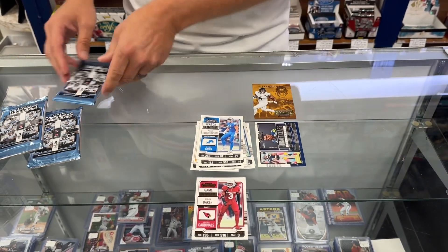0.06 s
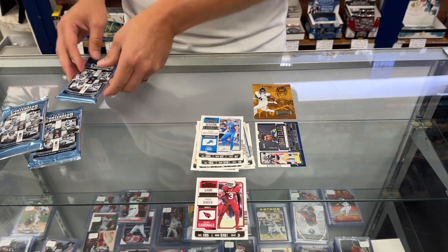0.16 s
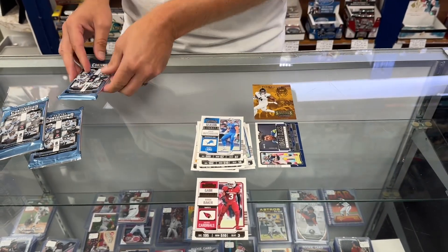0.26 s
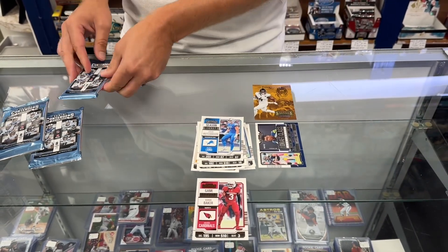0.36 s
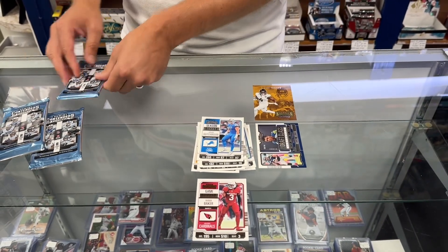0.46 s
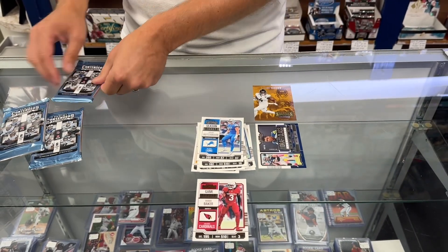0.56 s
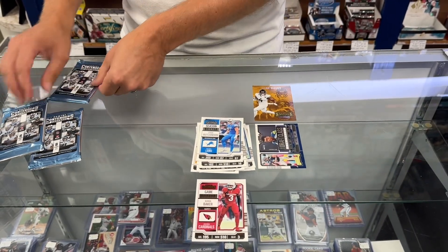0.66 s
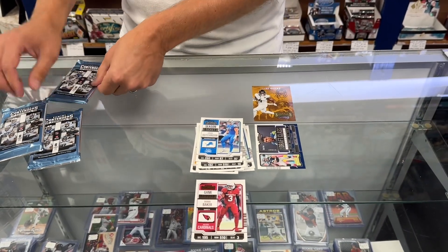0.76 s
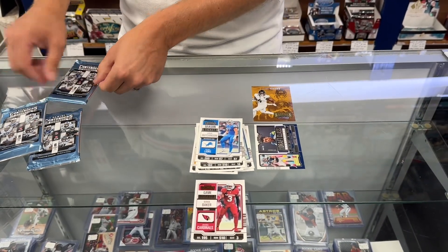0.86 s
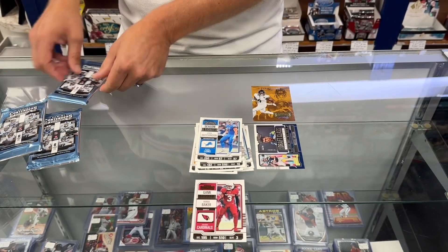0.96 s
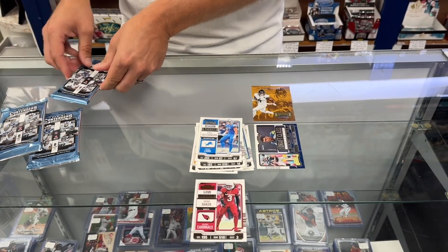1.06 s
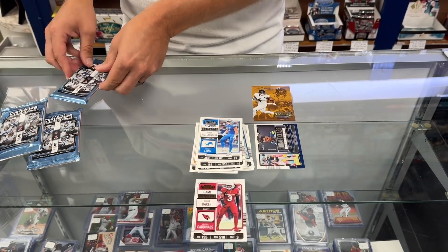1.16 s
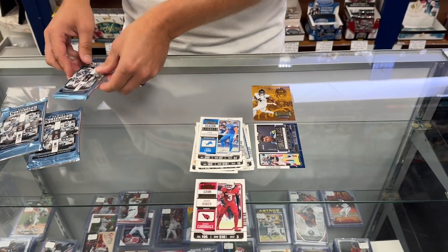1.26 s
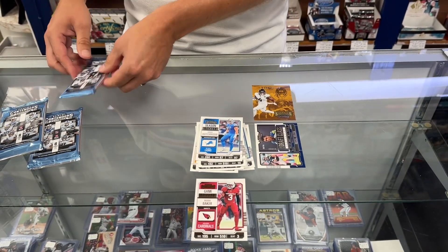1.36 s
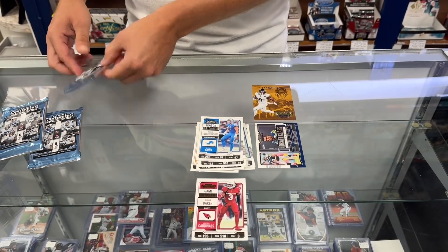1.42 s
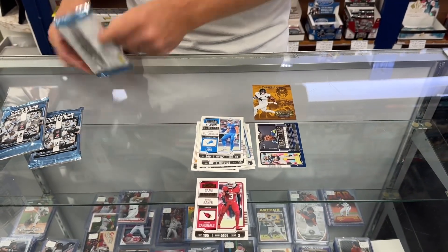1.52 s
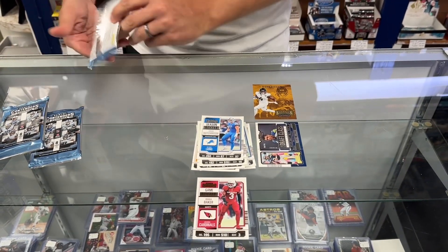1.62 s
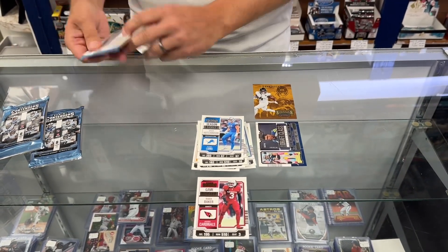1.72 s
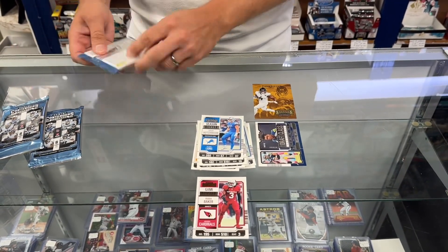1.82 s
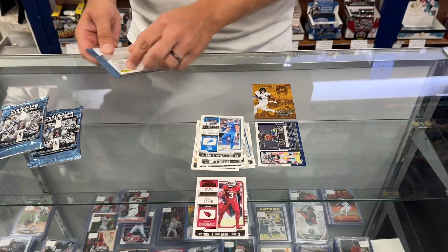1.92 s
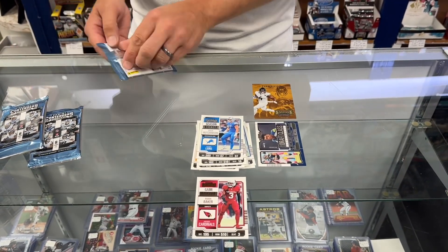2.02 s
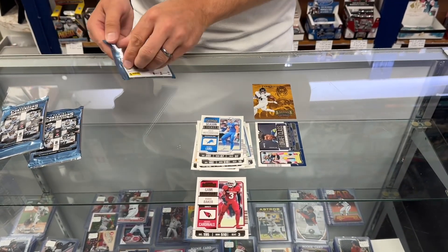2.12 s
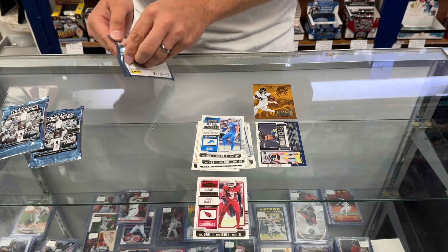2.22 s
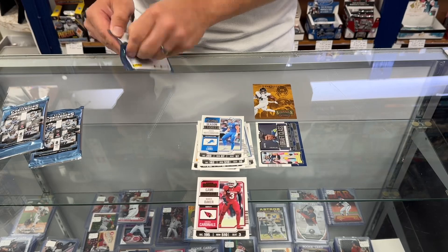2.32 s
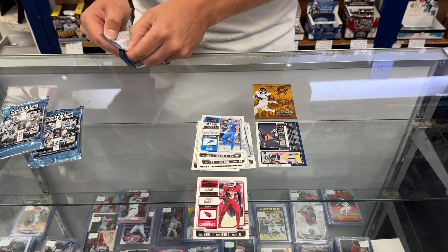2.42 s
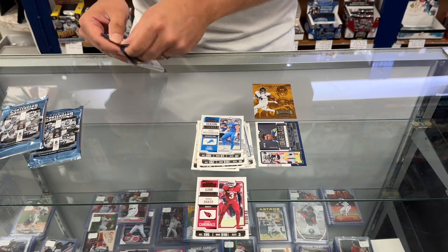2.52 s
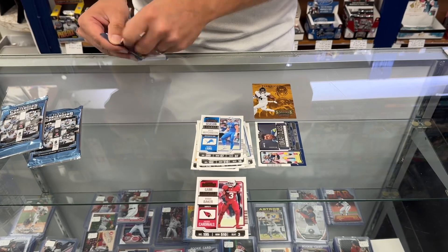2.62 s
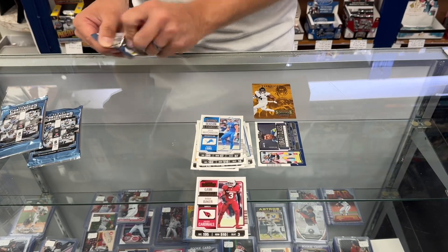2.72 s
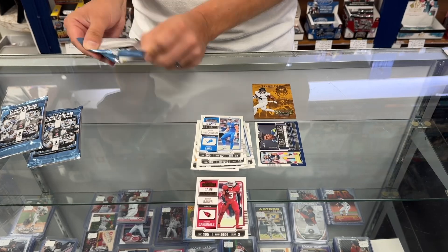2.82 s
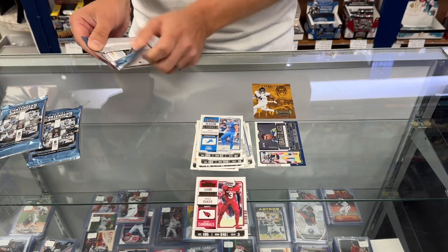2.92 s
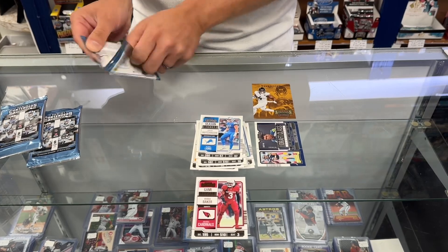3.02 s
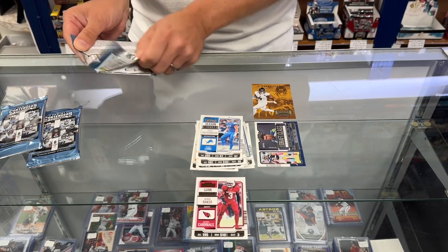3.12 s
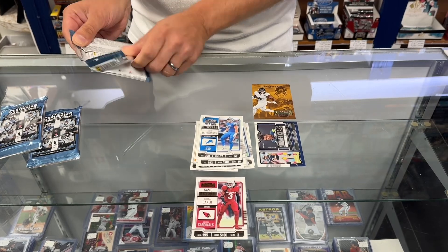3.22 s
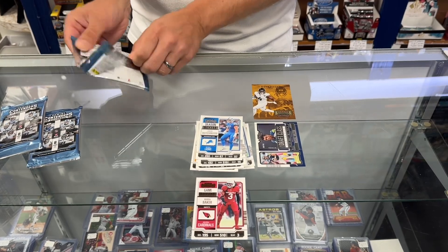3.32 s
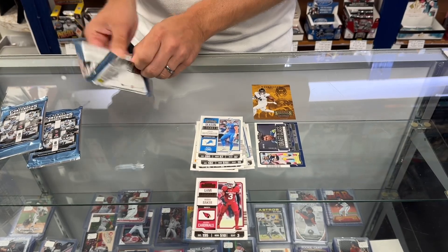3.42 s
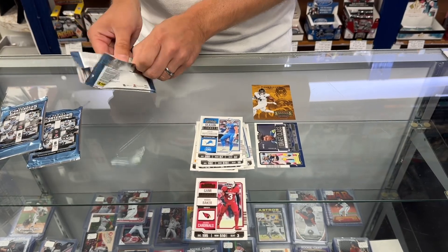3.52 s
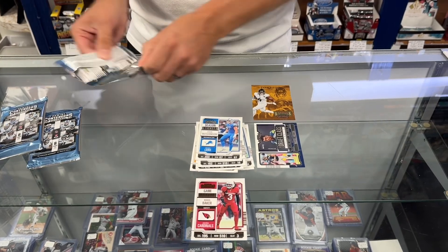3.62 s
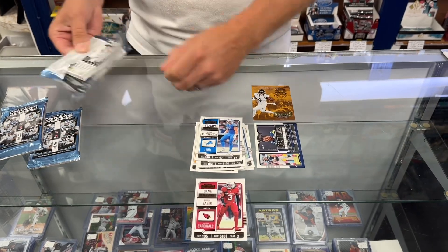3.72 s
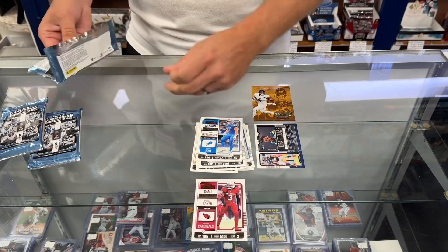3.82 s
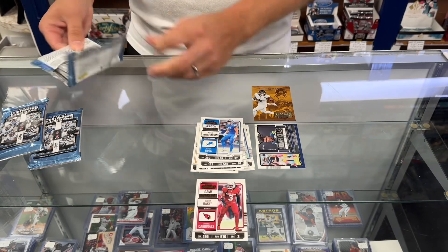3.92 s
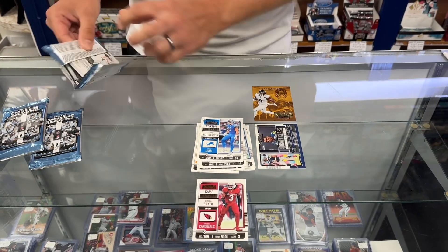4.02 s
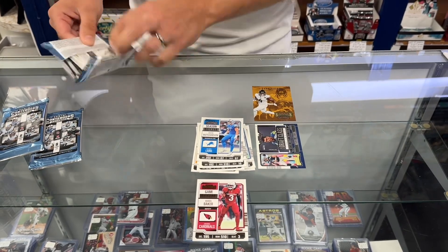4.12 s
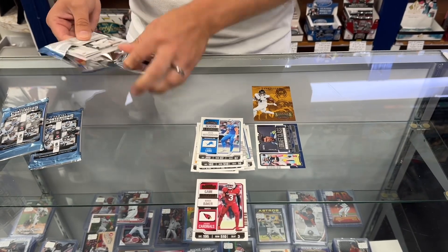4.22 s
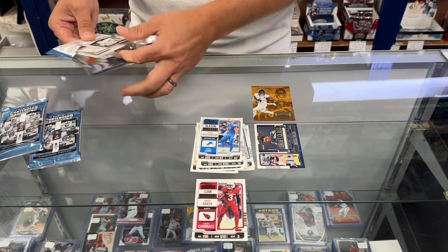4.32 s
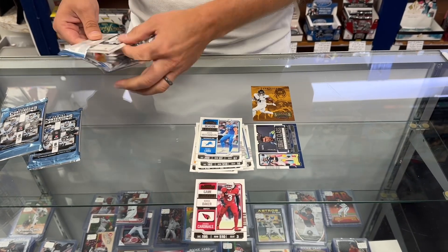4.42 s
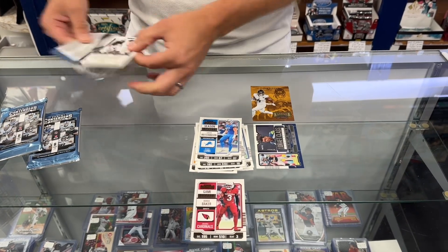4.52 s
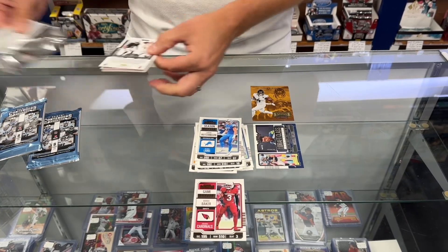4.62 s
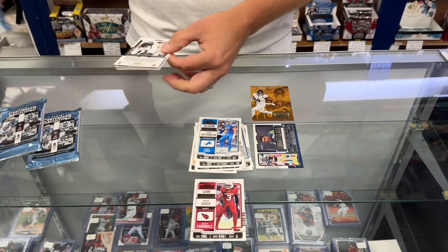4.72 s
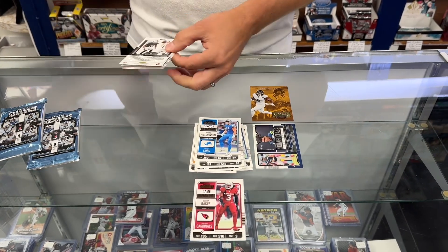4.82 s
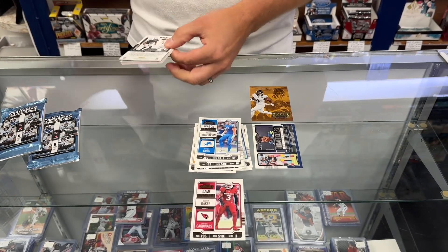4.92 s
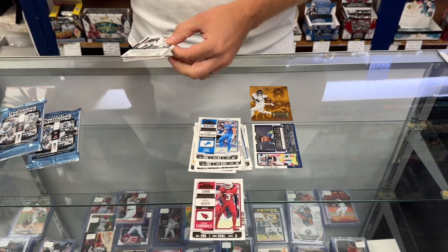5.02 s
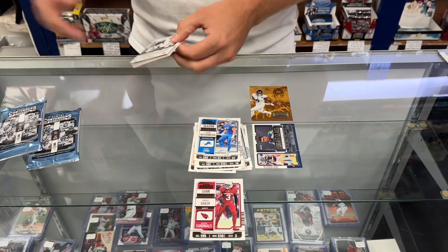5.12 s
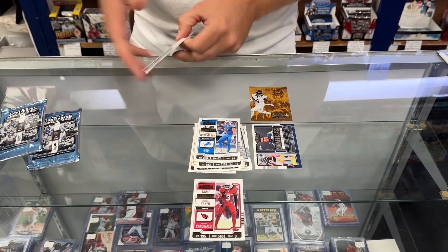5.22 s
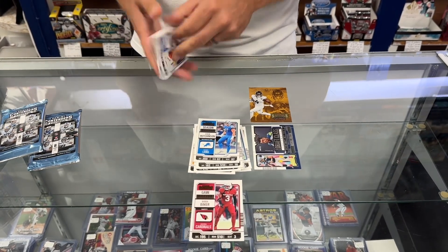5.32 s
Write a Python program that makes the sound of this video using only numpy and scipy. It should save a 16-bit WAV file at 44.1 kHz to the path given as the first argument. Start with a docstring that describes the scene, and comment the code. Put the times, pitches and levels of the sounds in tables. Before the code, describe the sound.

A foil card pack is picked up off a glass counter, crinkled and ripped open with sharp crackling snaps in a small shop.

```python
"""First a foil card pack slides and knocks softly on a glass shop counter as hands pick it up.
They crinkle it, rip it open in a few pulls and slide the cards out: sharp snaps over a dense crackle.
Snaps are short noise bursts and facet rings, crackle is random grains, and pops and knocks are fading tones.
A two-port phone microphone hears it at arm's length in a small room; filtered noise and a sine
make the ventilation rumble and mains hum."""
import sys
import numpy as np
from scipy import signal
from scipy.fft import rfft, irfft
from scipy.io import wavfile
from scipy.ndimage import uniform_filter1d

SR = 44100
rng = np.random.default_rng(int(sys.argv[2]) if len(sys.argv) > 2 else 0)


def waveform_to_disk(signal):
    """Save audio, clipped to [-1, 1], as 16-bit WAV at the path in sys.argv[1]."""
    frames = np.transpose(np.atleast_2d(signal))
    scaled = np.clip(frames, -1, 1) * 32767
    samples = np.round(scaled).astype(np.int16)
    wavfile.write(sys.argv[1], SR, samples)


N = 236448

# Source levels in these tables are before the small trims inside the functions.
# the loudest creases that buckle: (time [s], flex of the whole pouch [dB], foil sheet [dB],
# sharp crease edge [dB], ring of the facet [Hz])
LOUD_SNAPS = [(0.0721, -49.5, -45, -44, 2150), (0.2857, -64, -43, -41, 4970),
              (0.3143, -61.5, -48.5, -55, 4100), (0.403, -72, -47.5, -50, 2290),
              (0.4147, -46, -36.5, -30, 2600), (0.479, -61, -37.5, -31, 4550), (0.772, -57, -42, -36, 3430),
              (0.7895, -50, -29, -24, 4440), (1.235, -59.5, -41, -45, 5330),
              (1.3508, -49.5, -35, -30, 5240), (1.4459, -53.5, -41, -38, 4700),
              (1.46, -54.5, -41.5, -28, 6000), (1.6268, -50, -47, -42, 4000),
              (1.6819, -53.5, -44, -40.5, 3700), (1.754, -57, -40, -33.5, 3750),
              (1.7936, -57.5, -39.5, -40, 4600), (1.8485, -50.5, -35.5, -37, 3360),
              (1.938, -57, -48.5, -45, 4430), (2.0447, -52, -39.5, -36.5, 3440),
              (2.1293, -50, -37, -27, 6000), (2.134, -50.5, -32.5, -29, 4460),
              (2.21, -52, -38.5, -33, 6000), (2.221, -49, -37, -26, 4300), (2.2601, -48.5, -46, -33, 5300),
              (2.2738, -48.5, -34, -28, 4470), (2.3226, -69, -59, -37, 3420),
              (2.3503, -56, -36, -33.5, 4700), (2.3912, -53.5, -43.5, -38, 3860),
              (2.4433, -55.5, -44.5, -37, 3400), (2.4973, -44.5, -40.5, -41.5, 2260),
              (2.5649, -57, -50.5, -44.5, 3440), (2.637, -53, -33.5, -28.5, 3570),
              (2.6967, -50.5, -31.5, -22.5, 4300), (2.6994, -54.5, -27, -21, 4760),
              (2.725, -34.5, -24.5, -32.5, 4900), (2.789, -31, -32.5, -27.5, 3700),
              (2.8087, -29.5, -20, -26.5, 3500), (2.9142, -43.5, -39.5, -32.5, 2700),
              (2.985, -50.5, -37, -44.5, 5300), (3.0558, -48.5, -30.5, -37, 3660),
              (3.1024, -41, -26.5, -23, 4400), (3.112, -55, -21.5, -27, 3700),
              (3.174, -43.5, -42.5, -52.5, 2500), (3.1879, -51, -33, -29.5, 4870),
              (3.204, -45.5, -33, -29.5, 4270), (3.283, -60, -48, -35, 3500),
              (3.301, -68, -41.5, -38, 4720), (3.336, -47, -39.5, -38.5, 4730),
              (3.353, -53, -34.5, -31.5, 2680), (3.3628, -53, -41, -40, 5760),
              (3.521, -57, -36.5, -36.5, 5300), (3.6155, -36.5, -33, -23.5, 3580),
              (3.6613, -34.5, -19, -20.5, 4150), (3.6909, -38, -29.5, -18.5, 3830),
              (3.7009, -48, -27.5, -28, 6480), (3.9996, -67, -67.5, -71.5, 3300),
              (4.1852, -65, -37, -30, 2400), (4.2164, -54.5, -40.5, -39.5, 4180),
              (4.4527, -63, -46.5, -55, 3400), (4.5019, -47.5, -46, -44.5, 2320),
              (4.7459, -55.5, -52.5, -79, 2500), (4.783, -60, -44.5, -36.5, 2700),
              (4.9188, -55.5, -52.5, -53, 3000), (5.3493, -48, -49.5, -52, 2500)]
FACET_DECAY_S = .00045  # time constant of a facet's ring
FACET_HZ, FACET_OCTAVES = 4100, .42  # typical ring of a smaller facet and its spread from crease to crease
EDGE_FLUTTER = .055  # a crease edge ticks once and barely flutters afterwards
OPENING_START_S, OPENING_END_S = 1.62, 3.72  # both hands grip the wrapper

# what the three parts of the wrapper radiate: (frequency [Hz], relative level [dB])
POUCH_COLOUR = [(100, -15.5), (250, -8.5), (360, -3.5), (480, -2.5), (650, 2.5), (950, 3.5), (1300, 1),
                (1700, 0), (2300, -26)]
SHEET_COLOUR = [(1200, -28.5), (1900, 0.5), (2400, 5), (2950, 4.5), (3500, 7.5), (4400, 6), (5200, 5),
                (6200, -1), (7000, 2.5), (8500, -31.5)]
EDGE_COLOUR = [(5500, -33), (7200, 4), (8700, 1), (10200, 5), (11200, -8), (12800, -7), (15600, -1.5),
               (16300, -29), (18000, -53.5)]

# pulls that rip the seam: (start [s], end [s], level at the end [dB],
# pouch flex at the end, relative [dB], crease edges, relative [dB])
RIPS = [(2.645, 2.8, -33, -6.5, 1), (3.09, 3.107, -43.5, -1.5, 5), (3.587, 3.621, -34.5, -7, -3),
        (3.644, 3.695, -41.5, -3, 3.5)]
RIP_SWELL_DB_PER_S = 57.5  # a running tear grows louder
RIP_OPENING_DB_PER_S = 66.5  # the widening mouth deepens it
RIP_RISE_S, RIP_FALL_S = 0.025, 0.047  # time to swell or fade by 20 dB

# the fingers squeeze the pack: (time of the firmest grip [s], time to swell by 20 dB [s],
# time to fade by 20 dB [s], level [dB], pouch flex, relative [dB], crease edges, relative [dB]);
# swell and fade times below 1 ms, also negative ones, act as 1 ms
SQUEEZES = [(0.412, 0.8, 0.3, -65.5, -8, -3), (0.792, 0.1, 0.13, -57.5, -13, -8),
            (0.902, -0.08, .15, -56.5, -12, -3), (1.363, 0.03, 0.0349, -45, -13.5, 5),
            (1.461, 0.1335, 0.1248, -55.5, -13, 4.5), (1.643, -0.03, .16, -53, -6, 0.5),
            (1.826, 0.0657, 0.03, -47.5, -10, 4.5), (2.026, 0.05, -0.18, -48, -9, 8),
            (2.139, 0.11, -0.2, -53, -3, 0), (2.3, 0.19, 0.15, -45, -17.5, 3),
            (2.495, 0, 0.28, -55.5, -9.5, 0.5), (2.914, -0.03, 0.1, -49, -5, -3),
            (3.0, 0.04, 0.13, -47.5, -8.5, -4.5), (3.075, 0.14, -0.03, -54.5, -9, 1.5),
            (3.195, -0.21, 0.0636, -38.5, -11.5, -2), (3.285, -0.07, 0.0361, -52.5, -28, 10),
            (3.364, 0.03, 0.134, -50, -4, 0), (4.506, 0.19, 0.16, -56.5, -5, -2.5),
            (4.926, 0.07, 0.11, -64, 2.5, -1)]

# foil slides over glass, fingers or cards: (start [s], end [s], level [dB],
# pouch flex, relative [dB], crease edges, relative [dB])
SLIDES = [(0.03, 0.296, -66, -10, 4.5), (0.394, 0.577, -68.5, -8.5, 10), (0.9, 1.14, -74, -2.5, 1),
          (1.183, 1.508, -65.5, -6, 1.5), (1.658, 2.48, -70, -4.5, 6), (2.854, 3.45, -63, -4.5, 2.5),
          (3.54, 3.812, -83, 11.5, 25), (4.132, 4.21, -61, -5.5, 3.5), (4.254, 4.44, -73.5, -6, 6),
          (4.45, 4.502, -52.5, -15, 6), (4.743, 4.79, -69.5, -2, -2), (5.283, 5.364, -75, -3, 2)]
SLIDE_RISE_S, SLIDE_FALL_S = 0.0203, 0.073  # time to swell or fade by 20 dB
REST_DB, REST_EDGE_DB = -86, -6  # foil lying still in the hand, and its crease edges relative to that

# the pouch pops open under a pull: (time [s], pitch [Hz], level before swell and decay [dB])
POPS = [(2.7786, 914, -25.5), (2.7835, 640, -30.5), (3.1125, 622, -32.5), (3.667, 365, -31),
        (3.675, 732, -32)]

# fingers and pack bump the counter: (time [s], thud [dB], glass ring [dB])
KNOCKS = [(0.072, -64, -51), (0.13, -40, -57.5), (0.675, -67, -90), (0.902, -35, -47.5), (0.931, -47, -93),
          (0.963, -50, -59), (0.978, -52.5, -54), (3.668, -39.5, -78.5), (4.153, -46.5, -64),
          (4.744, -42, -71.5), (4.827, -47.5, -80.5), (4.91, -48, -57), (5.351, -65, -52)]
# tones of the counter top: (frequency [Hz], relative level [dB], time to fade by 60 dB [s])
COUNTER_MODES = [(103, -4.5, .14), (134, -5.5, 0.2), (203.5, -0.5, 0.063), (258, 4, 0.07), (331, -4, 0.035),
                 (750, 4.5, 0.038), (1399, 1, 0.069), (1780, 0.5, 0.041), (2050, -1.5, 0.042),
                 (2500, -4, .022), (3840, -2, 0.023)]
GLASS_HZ = 600  # counter tones below this belong to the thud, the others to the glass ring

# between the two microphone ports: (frequency [Hz], left minus right [dB], left leads by [radians])
PORT_DIFFERENCES = [(100, 0.5, .1), (450, 3.5, .3), (900, 4, 1.1), (2400, 3.5, 1.53), (3700, 3.5, 1.91),
                    (4400, 4, 4.92), (5300, 2, 6.3), (7300, 4.5, 9), (7630, 1.1, 10.08), (11270, 0, 8.26),
                    (16000, 0.5, 7)]
# colour of the shop's echo: (frequency [Hz], relative level [dB])
ROOM_COLOUR = [(150, 5), (600, 6.5), (2000, 3.5), (4000, 2.5), (6500, 3.5), (9000, -15.5), (15000, -10.5)]
# colour of the ventilation: (frequency [Hz], relative level per Hz [dB])
RUMBLE_COLOUR = [(20, -26), (35, -22.5), (52, -1), (75, -4), (105, -5), (150, -8.5), (220, -12), (320, -18),
                 (500, -25.5), (1000, -39), (2000, -44), (5000, -53.5), (9000, -58.5), (16000, -65)]
RUMBLE_DB, HUM_HZ, HUM_DB = -60.5, 58.2, -60  # before the small tilt between the ports
TOP_HZ = 16500  # the phone cuts what lies above


def snaps(creases, rise_s=0.000502, crack_s=.00025, flutter_s=0.0029, flutter=0.1, ring=1.0, apart=0.71,
          pouch_db=-0.5, sheet_db=-1.5, edge_db=-0.4, size=2048):
    """A crease flips in a fraction of a millisecond; its facet rings briefly and the pouch around it flexes.
    Rows: the sound sent to the left port, to the right port and all around."""
    out, t = np.zeros((3, N)), np.arange(size) / SR
    pouch, sheet, edge = response(POUCH_COLOUR), response(SHEET_COLOUR), response(EDGE_COLOUR)
    spread = np.sqrt(.003 * SR / size)  # levels are rms over a snap of 3 ms
    rise = 1 - np.exp(-t / rise_s)
    flip, settle = rise * np.exp(-t / crack_s), rise * np.exp(-t / flutter_s)
    all_noises = rng.standard_normal((len(creases), 3, size))
    for (s, flex_db, face_db, crease_db, hz), noises in zip(creases, all_noises):
        flex = spread * undb(flex_db + pouch_db)
        face = spread * undb(face_db + sheet_db)
        crease = spread * undb(crease_db + edge_db)
        # every facet faces its own way, so the two ports hear it a little differently
        crack = pair(noises, apart) * (flip + flutter * settle)
        facet = through(crack, np.cos(2 * np.pi * hz * t) * np.exp(-t / FACET_DECAY_S))
        tick = pair(noises, apart / 2) * (flip + EDGE_FLUTTER * settle)
        beamed = face * unit(unit(through(crack, sheet)) + ring * unit(facet))
        beamed += flex * unit(through(noises[0] * settle, pouch))
        beamed += crease * unit(through(tick, edge))
        # over all directions the peaks of a facet average out
        around = flex * unit(pouch) + face * unit(sheet) + crease * unit(edge)
        add(out, s, np.vstack([beamed, around]))
    return out


def lesser_snaps(work_db, flex_db, crease_db, grip_db=-55, per_s=26, doubling_db=8, level_db=-45,
                 growth=0.52, scatter_db=2.5, pouch_db=-3, edge_db=1.5, count=400):
    """While the pack is opened smaller creases give way at random, more often and louder the harder
    the foil is worked. Rows as in LOUD_SNAPS."""
    chance = rng.random((count, 2))
    scatter = np.clip(rng.standard_normal((count, 4)), -2, 2)
    slot_s = (OPENING_END_S - OPENING_START_S) / count  # each slot may hold one snap
    times = OPENING_START_S + slot_s * (np.arange(count) + chance[:, 0])
    at = (times * SR).astype(int)
    effort_db = work_db[at] - grip_db
    gives_way = chance[:, 1] < per_s * 2 ** (effort_db / doubling_db) * slot_s
    db = level_db + growth * effort_db
    levels = np.column_stack([db + flex_db[at] + pouch_db, db, db + crease_db[at] + edge_db])
    levels = levels + scatter_db * scatter[:, :3]
    ring_hz = FACET_HZ * 2 ** (FACET_OCTAVES * scatter[:, 3])
    return np.column_stack([times, levels, ring_hz])[gives_way].tolist()


def crackle(work_db, flex_db, crease_db, rate=520, rip_rate=750, slide=0.2, buckle_db=-63,
            pouch_db=-1.0, sheet_db=-3.0, edge_db=-4.5):
    """Lightly touched foil mostly hisses as it slides; pressed harder it crackles, thickest along a rip."""
    t = np.arange(N) / SR
    ripping = sum((t > start) & (t < end) for start, end, *_ in RIPS)
    hiss = slide ** 2 + undb(buckle_db - work_db)
    buckling = grains(np.where(ripping, rip_rate, rate), hiss)
    parts = [(POUCH_COLOUR, flex_db + pouch_db), (SHEET_COLOUR, sheet_db), (EDGE_COLOUR, crease_db + edge_db)]
    return sum(through(buckling * undb(work_db + db), response(colour)) for colour, db in parts)


def grains(per_s, hiss, scatter_db=6.0, colour_db=6, grain_s=0.00069, apart=0.39):
    """Tiny creases give way at random over a smooth hiss, each with its own size and colour; left and right."""
    fired = rng.random(N) < per_s / SR
    sizes = fired * undb(scatter_db * np.minimum(rng.exponential(size=N), 3.5))
    width = 2 ** (2 / 3)  # each band spans two thirds of an octave
    out = 0
    for low_hz in 280 * width ** np.arange(9):
        strength = sizes * undb(colour_db * np.clip(rng.standard_normal(N), -2, 2))
        power = signal.lfilter([1], [1, -np.exp(-2 / (grain_s * SR))], strength ** 2)
        # the hands feed in a set amount of work, which the grains share out
        power /= uniform_filter1d(power, size=1500) + 0.011 * power.mean()
        gain = np.sqrt((power + hiss) / (1 + hiss))
        band = signal.butter(2, [low_hz, low_hz * width], "band", fs=SR, output="sos")
        out = out + signal.sosfilt(band, pair(rng.standard_normal((3, N)), apart) * gain)
    return out


def handling():
    """How hard slides, squeezes and rips work the foil: sheet level, relative pouch flex and
    relative crease edges, in dB."""
    t = np.arange(N) / SR
    moves = [(np.full(N, undb(REST_DB)), 0, REST_EDGE_DB)]
    for start, end, db, flex_db, crease_db in SLIDES:
        gain = undb(db) * stroke(t, start, end, SLIDE_RISE_S, SLIDE_FALL_S)
        moves.append((gain, flex_db, crease_db))
    for s, rise_s, fall_s, db, flex_db, crease_db in SQUEEZES:
        moves.append((undb(db) * stroke(t, s, s, rise_s, fall_s), flex_db, crease_db))
    for start, end, db, flex_db, crease_db in RIPS:
        to_go = np.clip(end - t, 0, end - start)
        gain = undb(db - RIP_SWELL_DB_PER_S * to_go) * stroke(t, start, end, RIP_RISE_S, RIP_FALL_S)
        moves.append((gain, flex_db - RIP_OPENING_DB_PER_S * to_go, crease_db))
    # the moves add up as powers
    sheet = sum(gain ** 2 for gain, _, _ in moves)
    pouch = sum((gain * undb(flex_db)) ** 2 for gain, flex_db, _ in moves)
    edges = sum((gain * undb(crease_db)) ** 2 for gain, _, crease_db in moves)
    return 10 * np.log10([sheet, pouch / sheet, edges / sheet])


def stroke(t, start, end, rise_s, fall_s):
    """Gain of one movement of the hands: it swells, holds and fades."""
    before = np.maximum(start - t, 0) / max(rise_s, 1e-3)
    after = np.maximum(t - end, 0) / max(fall_s, 1e-3)
    return undb(-20 * (before + after))


def pops(decay_s=0.0066, swell_s=0.0002, size=3000):
    """A face of the pouch flips outward and the air inside rings for a few cycles."""
    out, t = np.zeros(N), np.arange(size) / SR
    envelope = (1 - np.exp(-t / swell_s)) * np.exp(-t / decay_s)
    for s, hz, db in POPS:
        add(out, s, undb(db) * np.sin(2 * np.pi * hz * t) * envelope)
    return out


def knocks(contact_s=0.0027, thud_db=-6, glass_db=-3, size=12000):
    """Soft bumps stir the counter's low modes; a hard pack edge also rings the glass."""
    out, t = np.zeros(N), np.arange(size) / SR
    chances = rng.standard_normal((len(KNOCKS), len(COUNTER_MODES)))
    for (s, low_db, high_db), chance in zip(KNOCKS, chances):
        modes = np.zeros(size)
        # c shifts both the level in dB and the starting phase in radians
        for (hz, db, t60), c in zip(COUNTER_MODES, chance):
            bump_db = low_db + thud_db if hz < GLASS_HZ else high_db + glass_db
            modes += undb(db + c + bump_db - 60 * t / t60) * np.sin(2 * np.pi * hz * t + c)
        add(out, s, modes * (1 - np.exp(-t / contact_s)))
    return out


def ports(x):
    """The sound reaches the left port first and mostly louder; the phone's body shades the right one."""
    hz = np.arange(N // 2 + 1) * SR / N
    side_db, lead = along(hz, PORT_DIFFERENCES, axis=1), along(hz, PORT_DIFFERENCES, axis=2)
    right = np.sqrt(2 / (1 + undb(side_db) ** 2))  # keeps the summed power of the two ports
    return irfft(rfft(x) * right * np.array([undb(side_db), np.exp(-1j * lead)]), N)


def shop(x, wet_db=-15.0, t60_low=0.17, t60_high=0.18, counter_db=-16, shared_hz=1000, size=22050):
    """Quick reflections off glass and hands, then the short tail of the shelves;
    long waves reach both ports alike."""
    t = np.arange(size) / SR
    bass = signal.butter(2, shared_hz, "low", fs=SR, output="sos")
    treble = signal.butter(2, shared_hz, "high", fs=SR, output="sos")
    noises = rng.standard_normal((3, size))
    low, high = signal.sosfilt(bass, noises[0]), signal.sosfilt(treble, noises[1:])
    tail = low * undb(-60 * t / t60_low) + high * undb(-60 * t / t60_high)
    tail = tail * np.clip(t / 0.0017, 0, 1)
    near = (low + high) * np.exp(-t / .005) * (t > .001)
    irs = (undb(wet_db) * unit(tail) + undb(counter_db) * unit(near)) / np.sqrt(size)
    return np.array([through(through(x, ir), response(ROOM_COLOUR)) for ir in irs])


def ventilation(apart=0.34, sway_db=1.8):
    """Low, gently swaying air rumble, nearly the same at both ports, with a steady mains hum."""
    noise = pair(rng.standard_normal((3, N)), apart)
    rumble = unit(through(noise, response(RUMBLE_COLOUR, size=8192)))
    air = rumble * undb(RUMBLE_DB + sway_db * walk(6))
    hum = np.sqrt(2) * np.sin(2 * np.pi * HUM_HZ * np.arange(N) / SR) * undb(HUM_DB)
    return (air + hum) * undb(np.array([[.5], [-.5]]))


def undb(db):
    """Decibels to gain."""
    return 10 ** (np.asarray(db) / 20)


def unit(x):
    """Scale to rms 1."""
    return x / np.sqrt(np.mean(x ** 2) + 1e-30)


def along(hz, points, axis=1):
    """Read a column of a table on a log-frequency axis."""
    points = np.array(points, float)
    return np.interp(np.log(hz + 1), np.log(points[:, 0]), points[:, axis])


def response(points, size=2048):
    """Impulse response of unit energy with the given colour, its energy packed early (minimum phase)."""
    log_gain = along(np.arange(size // 2 + 1) * SR / size, points) * np.log(10) / 20
    cepstrum = irfft(log_gain)
    # folding the cepstrum forward leaves no sound before time zero
    cepstrum[1:size // 2] *= 2
    cepstrum[size // 2 + 1:] = 0
    return unit(irfft(np.exp(rfft(cepstrum)))) / np.sqrt(size)


def through(x, ir):
    """Pass a sound through an impulse response."""
    return signal.fftconvolve(x, ir if x.ndim == 1 else ir[None], axes=-1)[..., :x.shape[-1]]


def add(out, s, x):
    """Mix a sound in at a time in seconds."""
    i = int(np.clip(s * SR, 0, N - 1))
    out[..., i:i + x.shape[-1]] += x[..., :N - i]


def walk(rate):
    """Smooth random wander of rms 1 with about `rate` new values a second."""
    k = max(int(SR / rate), 2)
    steps = np.repeat(rng.standard_normal(N // k + 1), k)
    return unit(uniform_filter1d(steps, k)[:N])


def pair(noises, apart):
    """Left and right from three noises: one that both ports hear and one for each alone."""
    return (noises[0] + apart * noises[1:]) / np.sqrt(1 + apart ** 2)


def scene():
    """Wrapper and counter in the shop, heard directly and as echo, over the ventilation."""
    work = handling()
    snapped = snaps(LOUD_SNAPS + lesser_snaps(*work))
    crinkled = crackle(*work)
    bumps = pops() + knocks()
    direct = ports(snapped[:2] + crinkled + bumps)
    echo = shop(snapped[2] + crinkled[0] + bumps) * undb(np.array([[1.0], [-1.0]]))
    return direct + echo + ventilation()


def record(dry):
    """The phone cuts the top with a steep low-pass filter."""
    return signal.sosfilt(signal.ellip(8, .2, 70, TOP_HZ, fs=SR, output="sos"), dry)


dry = scene()
out = record(dry)
waveform_to_disk(out)
```